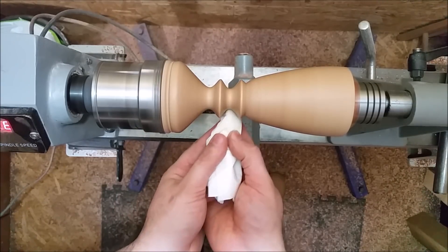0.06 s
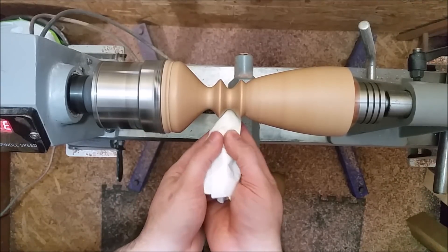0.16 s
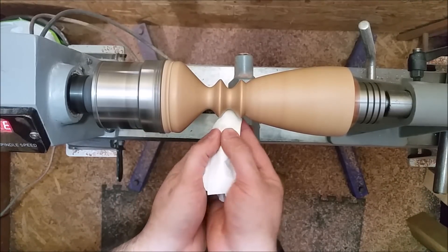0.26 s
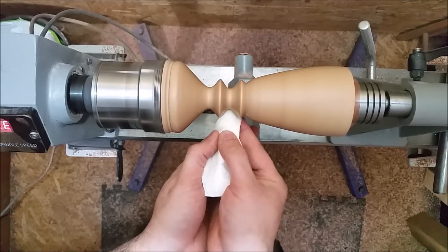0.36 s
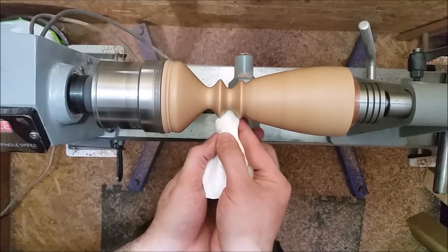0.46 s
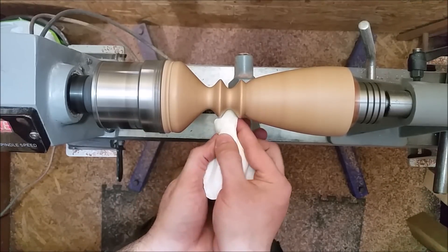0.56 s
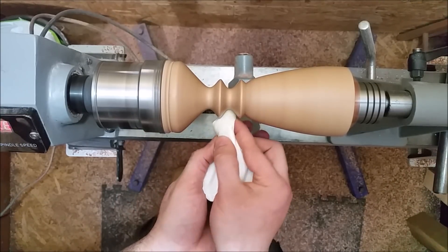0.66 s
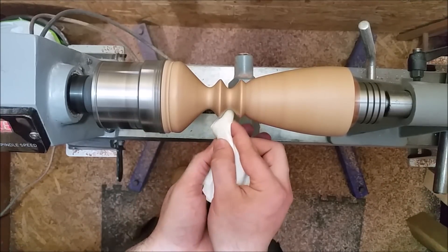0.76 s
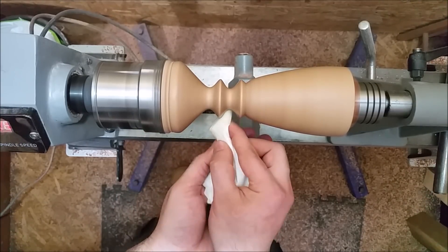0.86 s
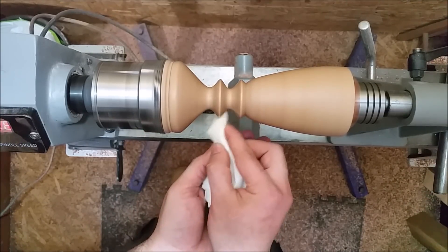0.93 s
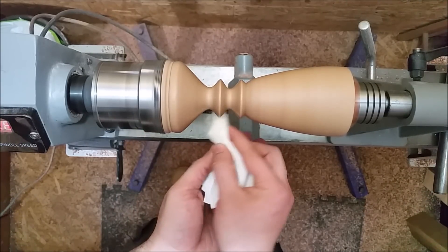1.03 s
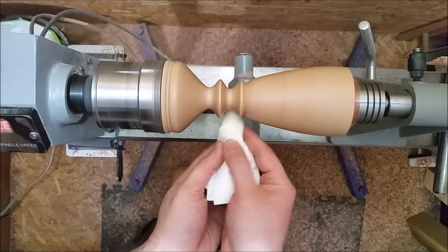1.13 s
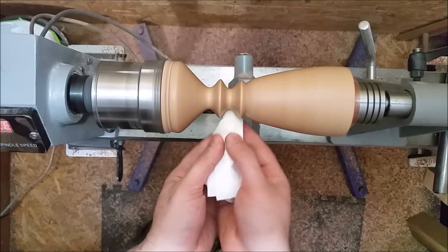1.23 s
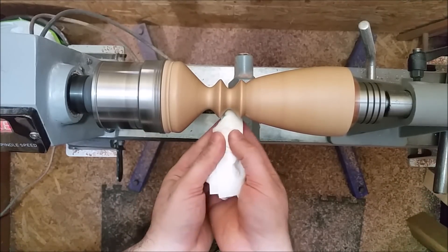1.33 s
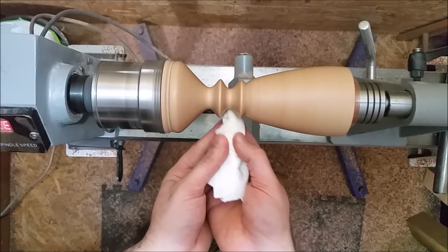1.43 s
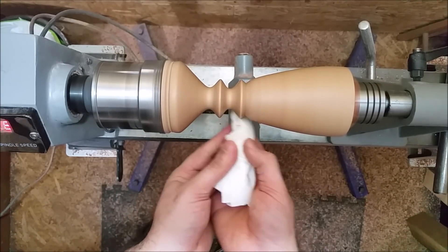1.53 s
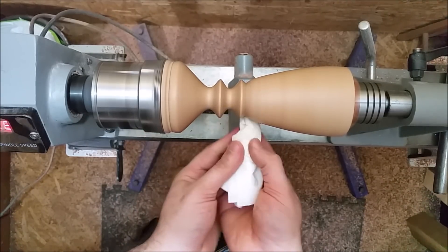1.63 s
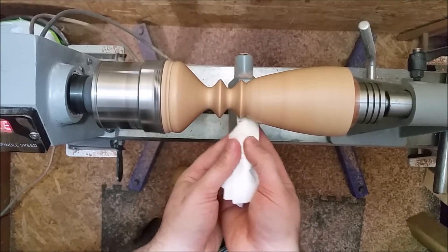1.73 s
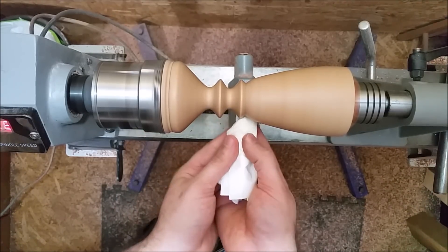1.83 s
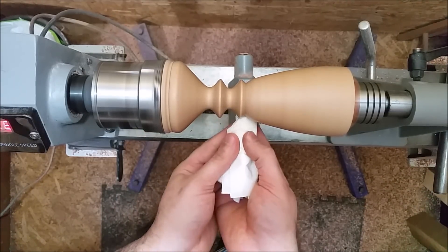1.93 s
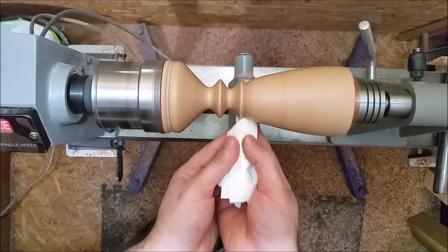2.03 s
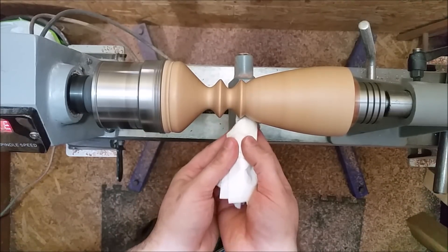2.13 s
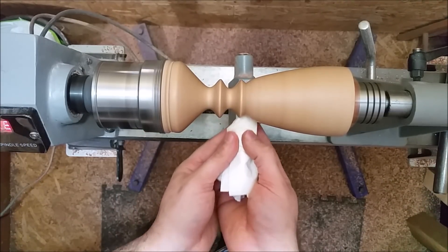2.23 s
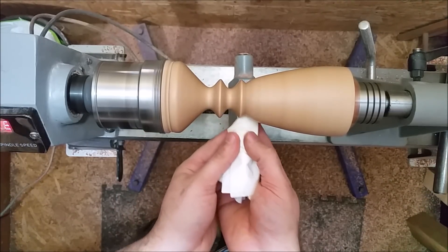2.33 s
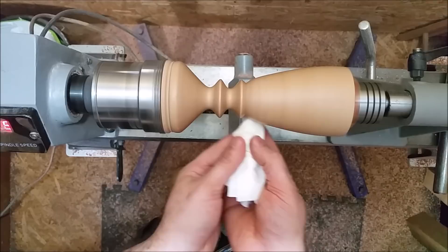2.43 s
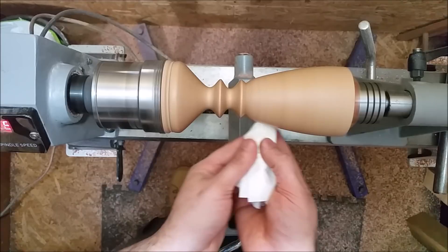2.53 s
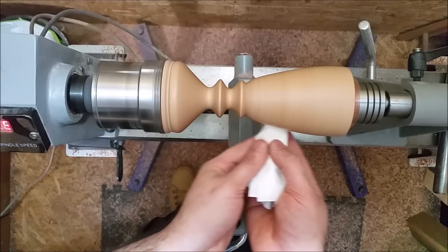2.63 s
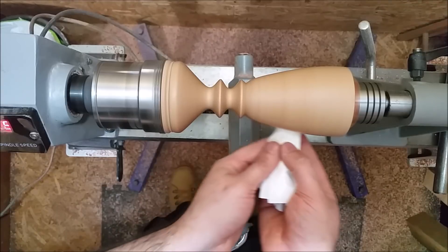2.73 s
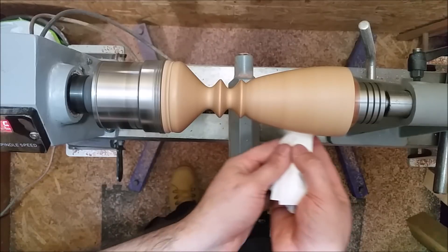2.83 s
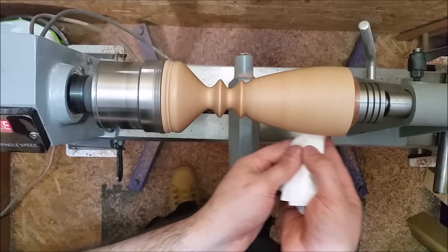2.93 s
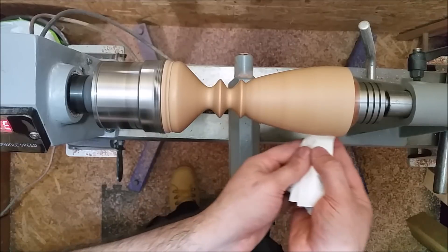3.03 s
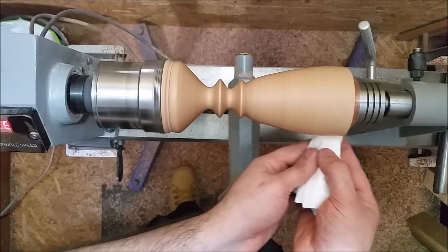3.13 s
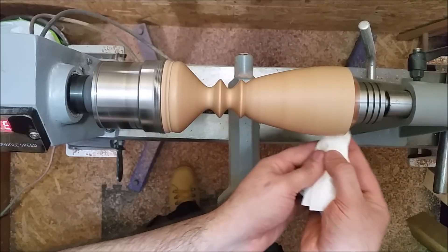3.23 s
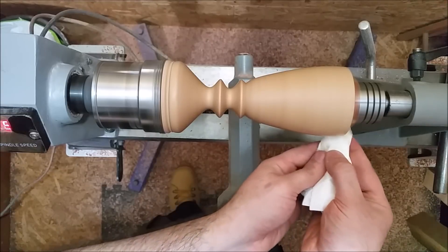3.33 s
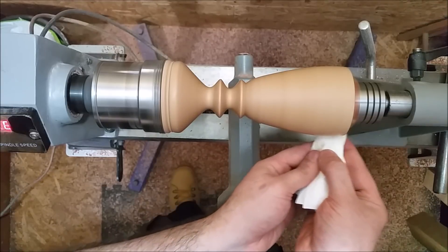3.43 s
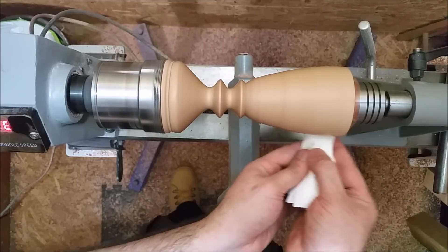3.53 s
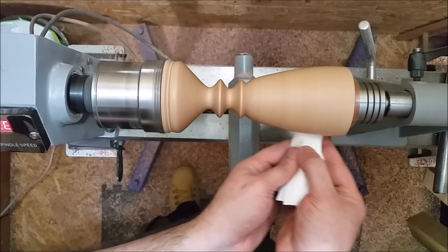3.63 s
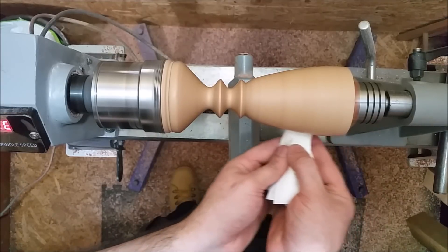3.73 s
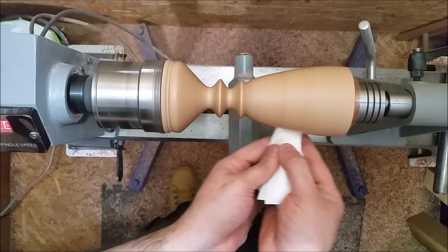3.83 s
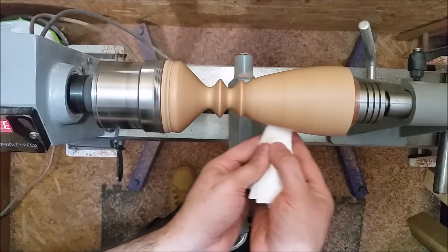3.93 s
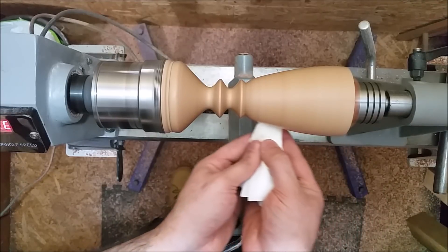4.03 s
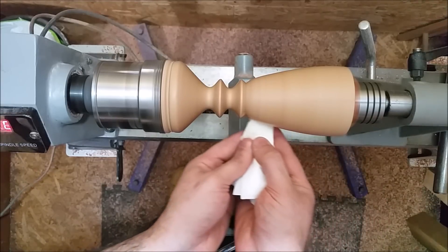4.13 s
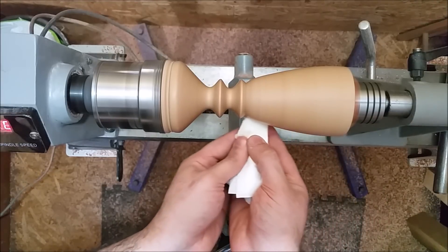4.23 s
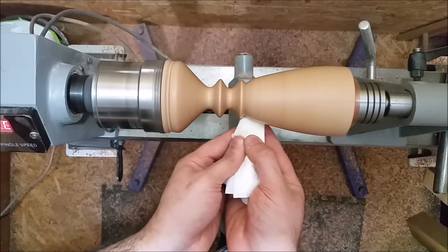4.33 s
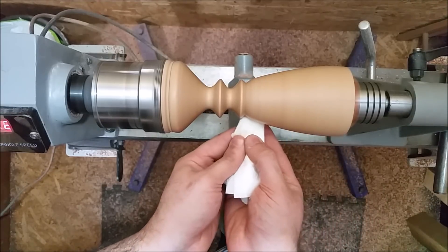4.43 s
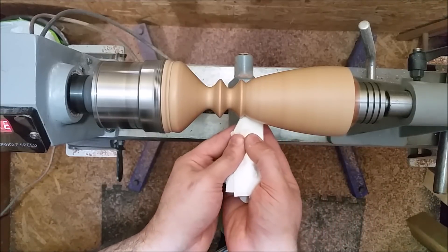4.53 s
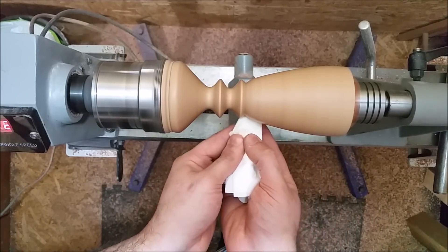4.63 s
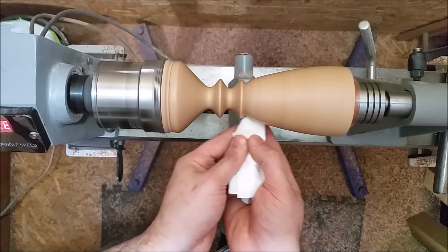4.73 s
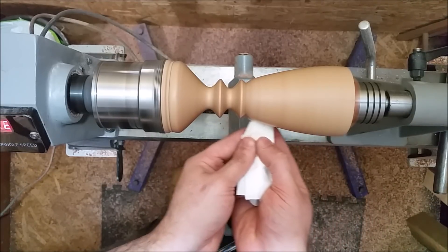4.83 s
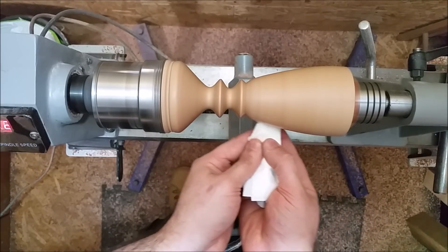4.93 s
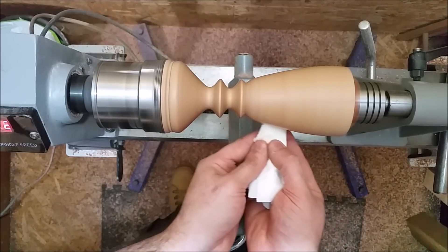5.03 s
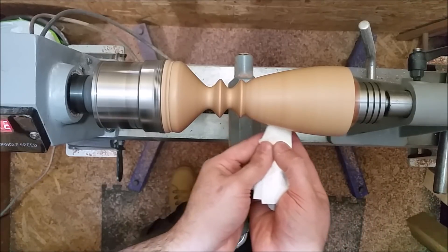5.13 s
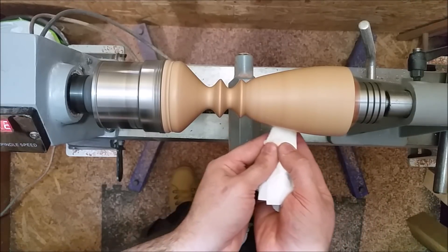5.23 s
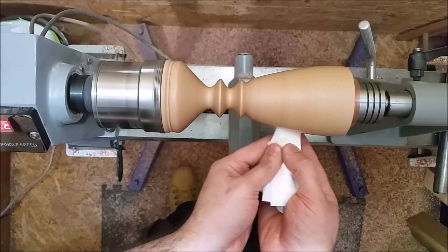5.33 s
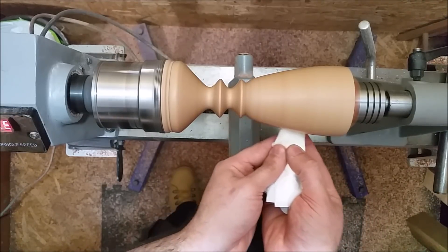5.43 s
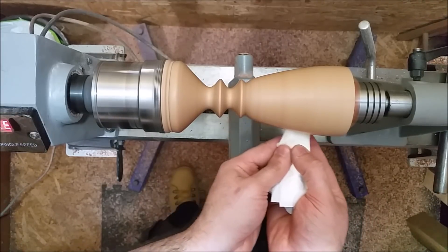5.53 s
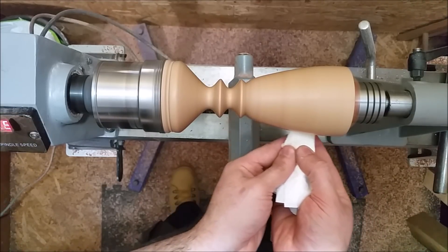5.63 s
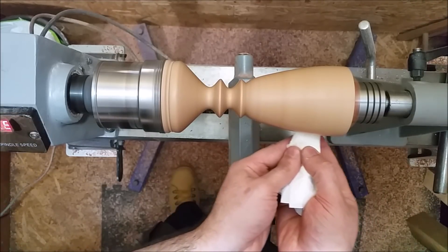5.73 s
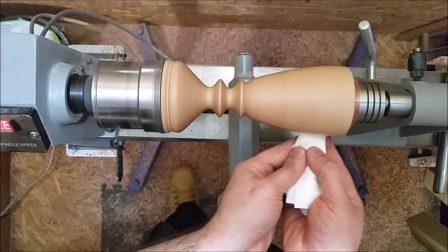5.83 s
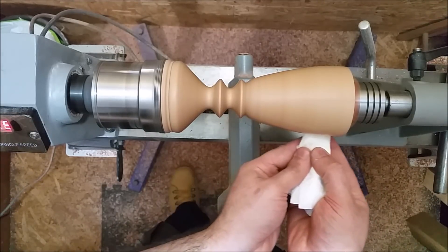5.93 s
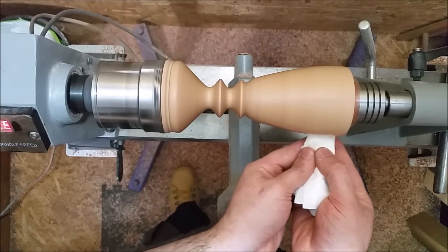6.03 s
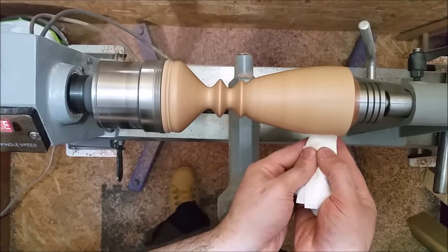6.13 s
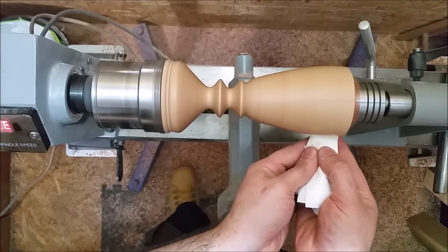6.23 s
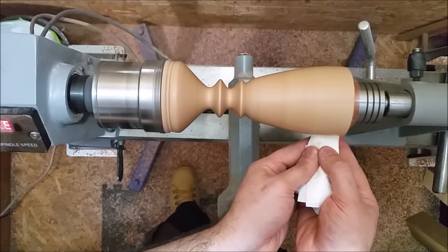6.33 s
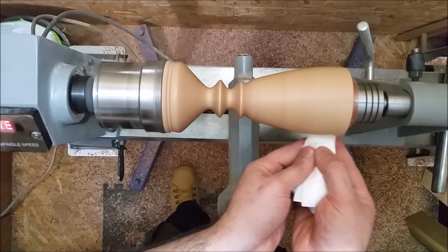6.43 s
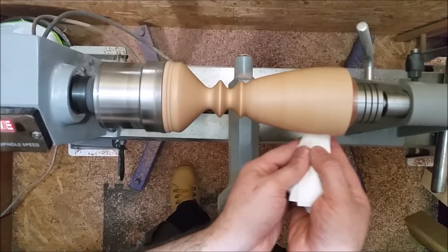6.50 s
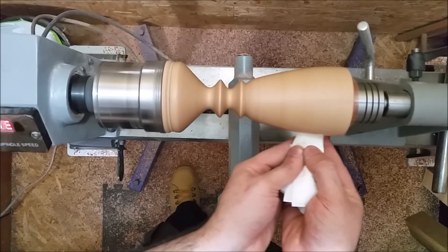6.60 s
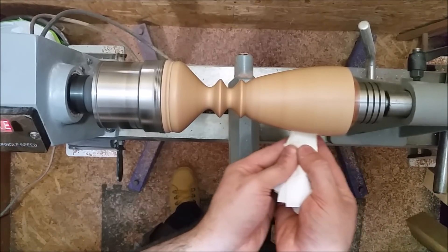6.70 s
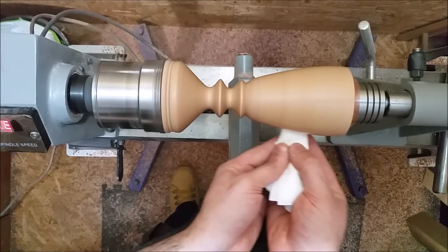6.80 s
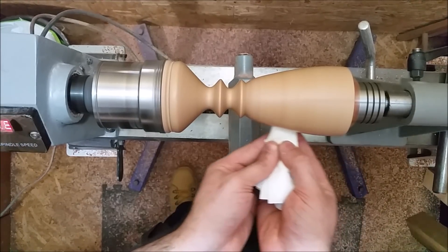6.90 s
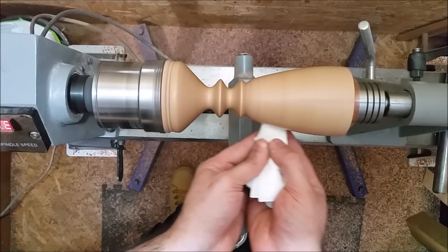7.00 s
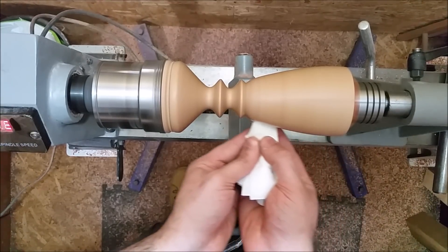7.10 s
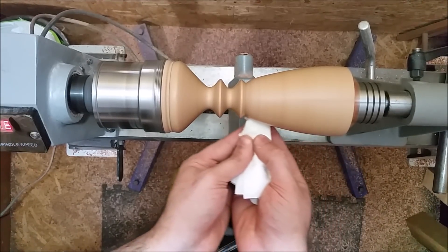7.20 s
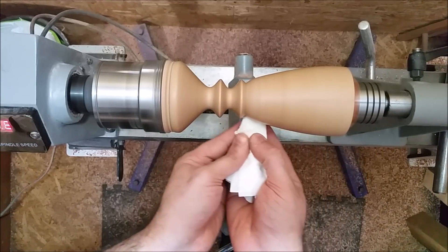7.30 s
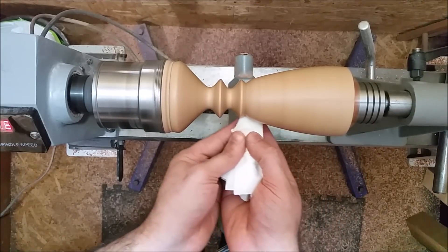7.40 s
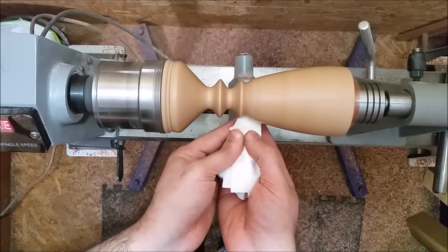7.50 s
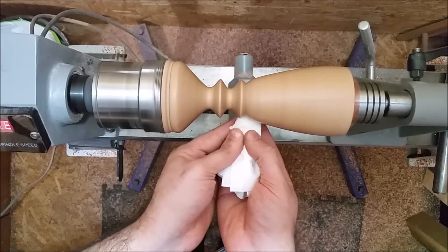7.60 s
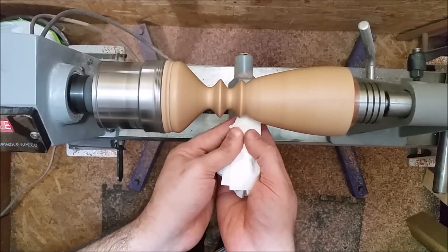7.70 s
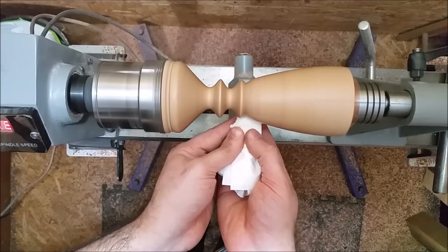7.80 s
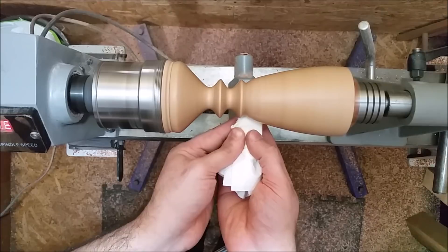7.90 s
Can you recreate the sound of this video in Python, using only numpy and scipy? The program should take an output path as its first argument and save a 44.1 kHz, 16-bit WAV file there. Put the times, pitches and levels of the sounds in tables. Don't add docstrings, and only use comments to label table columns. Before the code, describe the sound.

A wood lathe hums steadily in a small workshop while a cloth rubs the spinning wood, adding low buzzing chatter, soft hiss and faint squeaks.

```python
import sys
import numpy as np
from scipy import signal
from scipy.io import wavfile

SR = 44100
rng = np.random.default_rng(int(sys.argv[2]) if len(sys.argv) > 2 else 0)


def pcm_store(signal):
    levels = np.round(np.clip(np.atleast_2d(signal), -1, 1) * 32767)
    wavfile.write(sys.argv[1], SR, levels.astype(np.int16).T)


def invert_db(x):
    u = np.asarray(x, float) / 20
    return 10 ** u


N = 351036
TIME = np.arange(N) / SR

# order [spindle multiple], level [dB], left-right [dB], left lead [rad]
SLOT = [(11.25, 0, -6, .6)]


def drive(turn, load):
    # t/s, level/dB
    belt_level = [(0, -26), (.55, -28), (1.25, -33), (2.0, -27), (2.7, -28), (3.2, -37), (4.0, -40.5),
                  (4.7, -28), (5.0, -30), (5.4, -40.5), (6.0, -44), (6.5, -35.5), (7.4, -31), (7.96, -33.5)]
    # order, level/dB, left-right/dB, lead/rad
    belt = [(4.142, 0, -3.5, -.2)]
    # order, level/dB, left-right/dB, lead/rad
    motor_beat = [(6.127, 0, -1, 0)]
    # order, level/dB, left-right/dB, lead/rad
    lower = [(6.877, 0, -3, 0)]
    # order, level/dB, left-right/dB, lead/rad
    steady = [(1, -48, -.5, -.1), (3, -45, -2.5, -.1), (5.248, -49, -1, -.5), (6.25, -47, -1, 0),
              (7.127, -42, -2.5, 0), (8.252, -48, -1.5, -.2), (12.39, -60, -1, 0), (12.77, -60, -1, 0)]
    # order, level/dB, left-right/dB, lead/rad
    bearing = [(18.38, -63, -2, .5), (18.95, -64, -2, -.5), (34.4, -71, -3, 1), (59.8, -71, -4, 2.4),
               (94.8, -71, -4, 3), (128.2, -73, 2, 0)]
    # order, level/dB, left-right/dB, lead/rad
    unloaded = [(10.78, -57, -5, .6), (11.9, -63, -3, .3), (33.63, -61, -3, .3), (71.54, -70, -4, 3),
                (78.35, -62.5, -4, 3.3)]
    # level/dB, loss/dB per load, partner share, share per load, lag/s
    lower_rule = (-40, 0, -0.14, -0.2, -1.06)
    slot_rule = (-55.5, -6, 1.5, 0.5, -0.02)
    # t/s, change/dB, half length/s
    slot_lulls = [
        (5.6, -9, 0.41),
        (6.6, -7, 0.34),
    ]
    belt_db, = in_time(belt_level)
    slot_db = beating(slot_rule, load) + swells(slot_lulls)
    hum = tones(belt, turn, belt_db, wobble_db=.4, jitter=.08)
    hum = hum + tones(motor_beat, turn, -38 - 0.5 * load, wobble_db=1.0, jitter=.1)
    hum = hum + tones(lower, turn, beating(lower_rule, load), wobble_db=1.1, jitter=0.25)
    hum = hum + tones(SLOT, turn, slot_db, wobble_db=0.25, jitter=0.27)
    hum = hum + tones(steady, turn, 0, wobble_db=1.5, jitter=.15)
    hum = hum + tones(bearing, turn, 1.5, wobble_db=2.5, jitter=.5)
    return hum + tones(unloaded, turn, np.minimum(-6.0 * load, 1.5), wobble_db=1.5, jitter=.4)


def beating(rule, load):
    level_db, loss_db, share, share_per_load, lag_s = rule
    cycle_start_s, cycle_s = 0.2, 2.47
    angle = 2 * np.pi * (TIME - cycle_start_s - lag_s) / cycle_s
    partner = np.clip(share + share_per_load * load, -.9, .9) * np.exp(1j * angle)
    return level_db - loss_db * load + 20 * np.log10(abs(1 + partner))


def cloth(turn, load, main_db, bite_db):
    # order, level/dB, left-right/dB, lead/rad
    main = [(6, 0, -1, -.1)]
    # order, level/dB, left-right/dB, lead/rad
    low_orders = [(5, 0, 0, -.6), (7, -2, -3, 0)]
    # order, level/dB, left-right/dB, lead/rad
    flats = [(8, 0, -1.5, -.2), (9, -17, -2, 0), (13, -17, -1, 0)]
    # order, level/dB, left-right/dB, lead/rad
    tenth = [(10, 0, -4.5, -.3)]
    # order, level/dB, left-right/dB, lead/rad
    fourth = [(4, 0, -3.5, -.2)]
    # order, level/dB, left-right/dB, lead/rad
    eleventh = [(11, 0, -6, .7)]
    # t/s, gain/dB, half length/s
    flats_strokes = [
        (6.1, 3.5, 0.2),
        (6.6, 6.5, 0.26),
    ]
    # t/s, gain/dB
    tenth_strokes = [(2.15, 13), (2.95, 14), (4.05, 14.5), (4.75, 13), (5.3, 6.8), (5.65, 19.5), (6.3, 15),
                     (7.05, 17.6), (7.6, 14)]
    # t/s, gain/dB, half length/s
    fourth_strokes = [(.1, 11, 0.37), (2.5, 6.6, .3), (3.5, 12.3, .4), (4.3, 7.4, 0.17), (5.0, 10, .2),
                      (6.4, 17.5, 0.41), (7.1, 11, 0.33), (7.7, 11, 0.21)]
    # t/s, gain/dB, half length/s
    eleventh_strokes = [(3.2, 14, 0.15), (3.85, 15, 0.22), (5.5, 5.3, 0.18), (6.1, 20, .3),
                        (6.65, 19.4, 0.33), (7.3, 7.5, 0.18)]
    low_db = -50.5 + 10.5 * load + 0.74 * bite_db
    flats_db = -58 + 17.5 * load + bite_db + swells(flats_strokes)
    tenth_db = -67.5 + 10 * load + swells([(s, db, 0.21) for s, db in tenth_strokes])
    chatter = tones(main, turn, main_db, wobble_db=.6, jitter=.1)
    chatter = chatter + tones(low_orders, turn, low_db, wobble_db=2.0, jitter=.15)
    chatter = chatter + tones(flats, turn, flats_db, wobble_db=1.3, jitter=.2)
    chatter = chatter + tones(tenth, turn, tenth_db, wobble_db=1.2, jitter=.2)
    chatter = chatter + tones(fourth, turn, -48.5 + swells(fourth_strokes), wobble_db=1.2, jitter=.15)
    return chatter + tones(eleventh, turn, -58 + swells(eleventh_strokes), wobble_db=1.2, jitter=.2)


def tool_rest():
    # t/s, f/Hz
    slide = [(0, 128), (2.0, 124), (2.8, 120.3), (3.85, 112.6), (4.9, 106.7), (5.6, 103.3), (7.3, 122),
             (7.96, 119)]
    # t/s, gain/dB, half length/s
    buzzes = [
        (2.8, 29, 0.25),
        (3.5, 28.1, 0.516),
        (5.07, 27.6, 0.35),
        (7.0, 26.8, 0.16),
    ]
    hz, = in_time(slide)
    level_db = -62 + swells(buzzes) + 1.2 * drift(4)
    return placed(2 * np.pi * np.cumsum(hz) / SR, level_db, -3.5, -.2)


def squeaks():
    # t/s, peak/dB
    catches = [
        (2.78, -50),
        (2.81, -51),
        (2.85, -47),
        (3.495, -49),
        (3.527, -41.5),
        (3.558, -49),
        (5.55, -50),
        (5.58, -49),
    ]
    band = signal.butter(2, [1100, 1650], "band", fs=SR, output="sos")
    noise = signal.sosfilt(band, rng.standard_normal(N))
    scuff = np.sin(2 * np.pi * 1340 * TIME) + .55 * rms_one(noise)
    bumps = swells([(s, invert_db(db), 0.0063) for s, db in catches])
    return bumps * scuff * invert_db([[-1.5], [1.5]])


def whine(turn):
    # t/s, level/dB
    whine_level = [(0, -49.5), (1.0, -48.5), (2.1, -46.5), (2.64, -45.5), (3.1, -50.5), (3.94, -50),
                   (4.21, -44.5), (5.79, -48.5), (6.1, -48.5), (6.56, -46), (7.3, -49.5), (7.55, -48),
                   (7.75, -46), (7.96, -49)]
    # t/s, change/dB, half length/s
    dip = [(7.45, -6, .1)]
    # t/s, left-right change/dB, half length/s
    shades = [(.35, -9, .25), (3.02, -8, 0.19), (3.98, -11, 0.17), (6.2, -10, 0.29), (6.74, -5, 0.22),
              (7.49, 6, .1), (7.8, -8, .1)]
    # t/s, below/dB, above/dB
    side_tones = [(0, -57, -60), (2, -58, -63), (4, -63, -67), (7.96, -66, -68)]
    level_db, = in_time(whine_level)
    level_db = level_db + swells(dip) + 6.5 + 0.77 * drift(10)
    pan_db = -6 + swells(shades)
    below_db, above_db = in_time(side_tones)
    phase, lead = 2 * np.pi * 12500.5 * TIME, 2.5 + 0.28 * drift(0.4)
    slots = SLOT[0][0] * turn
    out = placed(phase + .1 * drift(15), level_db, pan_db, lead)
    out = out + placed(phase - slots, below_db, pan_db, lead)
    return out + placed(phase + slots, above_db, pan_db, lead)


def casting():
    # f/Hz, width/Hz, level/dB
    resonances = [(79, 7.3, -46.5), (486.7, 2.9, -65), (570, 55, -63), (958, 22, -67), (1041, 19, -68.5),
                  (1228, 14, -69.5), (1346, 24, -68), (1733, 24, -65), (1876, 16, -65), (2140, 240, -71.5),
                  (2467, 23, -64.5), (2853, 9.8, -66.5), (3836, 50, -61.5), (4885, 41, -62.5)]
    out, white = 0, rng.standard_normal((2, N))
    for hz, width_hz, db in resonances:
        r = np.exp(-np.pi * width_hz / SR)
        poles = [1, -2 * r * np.cos(2 * np.pi * hz / SR), r * r]
        mid, side = rms_one(signal.lfilter([1, 0, -1], poles, white))
        out = out + invert_db(db + 1.8 * drift(.4)) * stereo(mid, side, hz)
    return out


def hiss(main_db):
    # t/s, level/dB
    rub = [(0, -50), (.22, -49.5), (.77, -46), (1.24, -54), (1.46, -48), (1.82, -51.5), (2.02, -46.5),
           (2.59, -51), (2.86, -47.5), (3.77, -50), (4.1, -50), (4.66, -51), (4.86, -48.5), (6.5, -49.5),
           (7.32, -48.5), (7.51, -51), (7.63, -48), (7.96, -49.5)]
    # f/Hz, density/dB per Hz
    mid_spectrum = [(260, -53), (440, -5), (572, -1), (754, -8.5), (893, -5.5), (1050, -6), (1150, -10),
                    (1340, -7), (1500, -10), (1950, -41), (3300, -120)]
    # f/Hz, density/dB per Hz
    upper_spectrum = [(880, -20), (1500, -3.5), (1780, -11), (2110, 0), (2520, 1), (3430, -4.5), (3930, -1),
                      (4120, -1), (4810, -0.5), (5690, -4), (7500, -5), (9750, -27), (16500, -120)]
    # f/Hz, density/dB per Hz
    top_spectrum = [(7000, -30), (7600, -39), (8400, -3.5), (9300, 4), (10500, 0), (12000, -0.5),
                    (12900, -3.5), (13300, -20)]
    # f/Hz, density/dB per Hz
    air_spectrum = [(12700, -14), (13200, 0), (14200, -2), (15000, -1), (16200, -1)]
    # t/s, change/dB, half length/s
    air_lulls = [(.1, -5, .08), (1.25, -13, 0.23), (1.75, -8, 0.14), (2.55, -3, .12), (3.48, -6, .05),
                 (4.5, -3, 0.18), (5.78, -2, .05), (7.07, -5, .04), (7.48, -3, .08)]
    top_db, = in_time(rub)
    rub_db = top_db + 49.5
    mid_db = -53.5 + 0.43 * (np.maximum(main_db, -31) + 29)
    upper_db = -48 + 0.35 * rub_db
    air_db = -58 + 1.1 * rub_db + swells(air_lulls)
    white = workshop_noise()
    out = invert_db(mid_db) * banded_noise(white, mid_spectrum, 0.43, count=8)
    out = out + invert_db(upper_db) * banded_noise(white[::-1], upper_spectrum, 0.5, count=12)
    out = out + invert_db(top_db) * banded_noise(white, top_spectrum, 0.54, count=8)
    return out + invert_db(air_db) * banded_noise(white[::-1], air_spectrum, .6, count=6)


def workshop_noise():
    out = []
    for source, other in rng.standard_normal((2, 2, N)):
        dull = signal.lfilter([.4], [1, -.6], source)
        mid = source + .35 * echoes(dull, spread_s=.04, count=40)
        side = .65 * echoes(mid, spread_s=.002, count=8) + .75 * other
        out.append([rms_one(mid), rms_one(side)])
    return np.array(out)


def echoes(x, spread_s, count):
    taps = np.zeros(int(spread_s * SR) + 1)
    taps[(rng.random(count) * spread_s * SR).astype(int)] = rng.standard_normal(count)
    return signal.fftconvolve(x, taps / np.linalg.norm(taps))[:N]


def bed_rumble():
    # f/Hz, density/dB per Hz
    rumble_spectrum = [(10, -12), (21, -13), (33, 5.5), (48, -11), (62, -3), (80, -3), (100, -4.5),
                       (125, -1), (160, -2.5), (200, -8), (250, -18), (290, -11.5), (365, -18.5),
                       (412, -37)]
    white = rng.standard_normal((2, 2, N))
    return invert_db(-38.5) * banded_noise(white, rumble_spectrum, 1.96, count=18)


def banded_noise(white, spectrum, patchy_db, count):
    out, together = 0, drift(5.2)
    edges = np.geomspace(spectrum[0][0], spectrum[-1][0], count + 1)
    for k, (low, high) in enumerate(zip(edges, edges[1:])):
        band = signal.butter(2, [low, high], "band", fs=SR, output="sos")
        mid, side = signal.sosfilt(band, white[k % 2])
        hz = np.sqrt(low * high)
        flicker_db = patchy_db * (together + 1.1 * drift(23))
        out = out + invert_db(at_hz(spectrum, hz) + flicker_db) * stereo(mid, side, hz)
    return out / np.std(out.mean(axis=0))


def stereo(mid, side, hz):
    # f/Hz, correlation
    likeness = [(60, 0.92), (99, 0.89), (160, 0.53), (270, 0.33), (450, 0.029), (740, 0.31),
                (1220, -0.0081), (2010, -0.26), (3330, -0.089), (5500, -0.12), (9080, -0.0061),
                (15000, -0.002)]
    # f/Hz, level/dB
    leaning = [(60, -1.5), (92, -3.0), (140, -2.0), (210, -1.5), (330, -5.0), (500, -2.0), (770, -2.5),
               (1170, -3.0), (1790, -4.0), (2740, -4.0), (4190, 2.5), (6410, 3.5), (9810, -2.5),
               (15000, -7.0)]
    alike, lean_db = np.clip(at_hz(likeness, hz), -1, 1), at_hz(leaning, hz) / 2
    pair = np.sqrt(1 + alike) * mid + np.sqrt(1 - alike) * side * [[1], [-1]]
    return pair * invert_db([[lean_db], [-lean_db]])


def tones(table, turn, level_db, wobble_db, jitter):
    out = 0
    for multiple, db, pan_db, lead in table:
        phase = multiple * turn + jitter * drift(5) + rng.uniform(0, 2 * np.pi)
        out = out + placed(phase, level_db + db + wobble_db * drift(4), pan_db, lead)
    return out


def placed(phase, level_db, pan_db, lead):
    left = invert_db(pan_db / 2) * np.exp(.5j * lead)
    right = invert_db(-pan_db / 2) * np.exp(-.5j * lead)
    wave = np.sqrt(8) * invert_db(level_db) * np.exp(1j * phase)
    return np.array([(wave * left).imag, (wave * right).imag]) / (abs(left) + abs(right))


def swells(rows):
    return sum(height * np.exp(-((TIME - s) / half_s) ** 2) for s, height, half_s in rows)


def drift(rate_hz):
    r = np.exp(-200 * np.pi * rate_hz / SR)
    white = rng.standard_normal(N // 100 + 1002)
    slow = signal.lfilter([1], [1, -2 * r, r * r], white)[1000:]
    return np.interp(np.arange(N) / 100, np.arange(len(slow)), rms_one(slow))


def in_time(rows):
    s, *columns = np.transpose(rows)
    return [np.interp(TIME, s, c) for c in columns]


def at_hz(points, hz):
    table_hz, values = np.transpose(points)
    return np.interp(np.log(hz), np.log(table_hz), values)


def rms_one(x):
    return x / np.sqrt(np.mean(x ** 2) + 1e-20)


def scene():
    # t/s, speed/turns per s
    spindle = [(0, 31.1), (.3, 31.2), (.8, 31.34), (1.3, 31.55), (2.0, 31.33), (2.6, 31.08), (3.05, 30.58),
               (3.45, 30.82), (3.95, 30.24), (4.25, 30.23), (4.8, 30.6), (5.3, 30.19), (6.2, 30.15),
               (6.6, 30.3), (7.0, 30.27), (7.5, 30.6), (7.96, 30.67)]
    # t/s, cloth pressure as main order level/dB, bite on the flats/dB
    hands = [(0, -40, -6), (.8, -36.5, -4), (1.7, -37, 5), (2.05, -32, -6), (2.8, -29, -8), (3.2, -26, 6.5),
             (3.45, -20.5, -4), (3.85, -26.5, 2.5), (4.4, -31.5, -2), (4.75, -27.5, -2), (5.15, -32, -2),
             (5.45, -26.5, -2.5), (6.15, -26, 3.5), (6.55, -21.5, 5), (7.0, -27, 1), (7.4, -31, 1.5),
             (7.65, -27, -2), (7.96, -26, -8)]
    speed, = in_time(spindle)
    turn = 2 * np.pi * np.cumsum(speed) / SR
    load = 31.2 - speed
    main_db, bite_db = in_time(hands)
    lathe = drive(turn, load) + cloth(turn, load, main_db, bite_db) + tool_rest() + squeaks()
    return lathe + whine(turn) + casting() + hiss(main_db) + bed_rumble()


def top_cut(x):
    return signal.sosfilt(signal.butter(12, 15730, fs=SR, output="sos"), x)


def record(dry):
    return top_cut(dry)


dry = scene()
out = record(dry)
pcm_store(out)
```